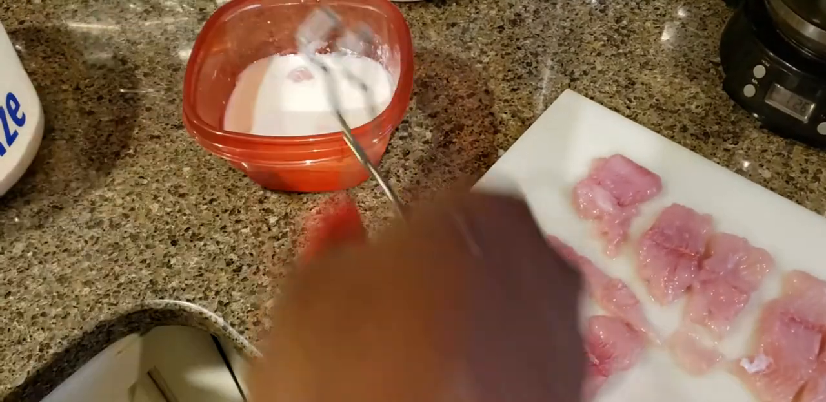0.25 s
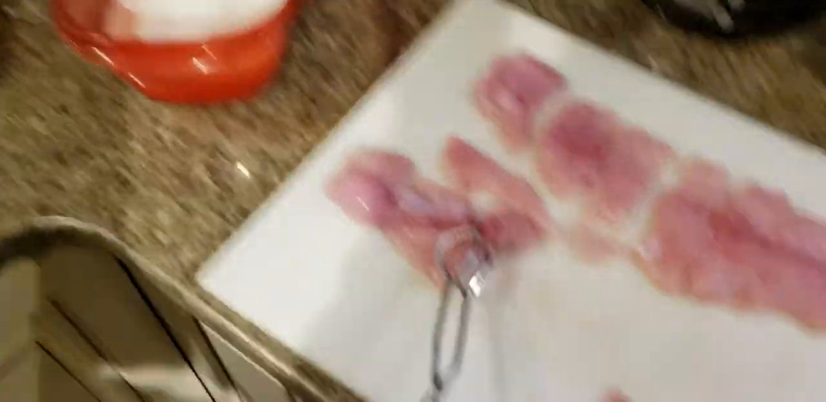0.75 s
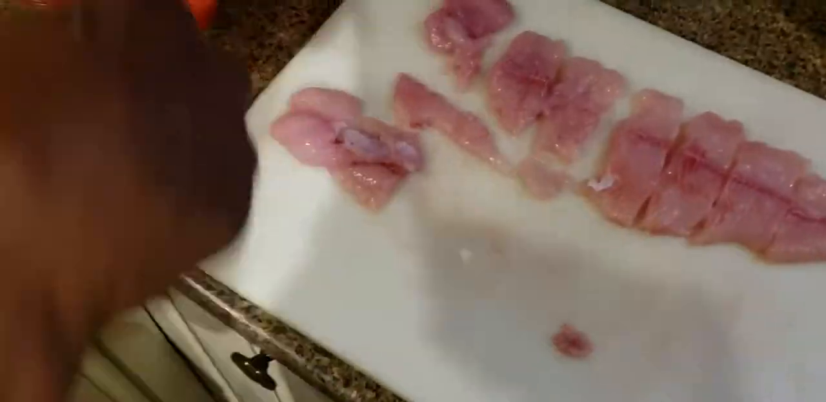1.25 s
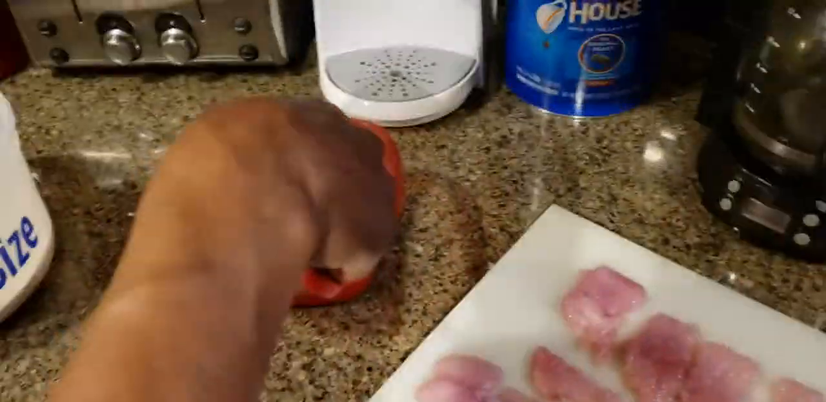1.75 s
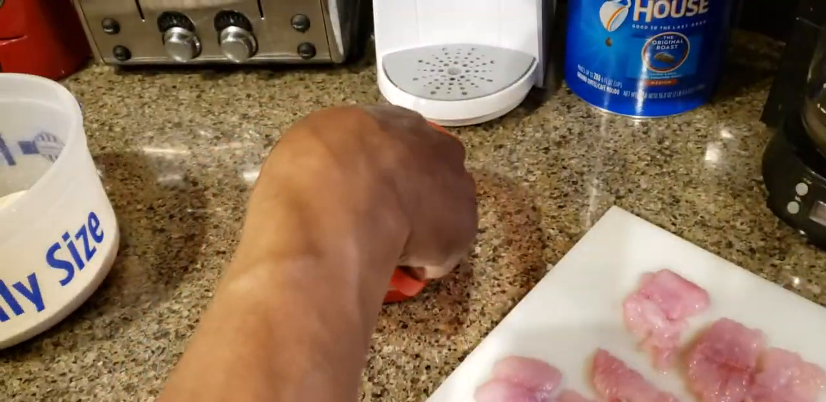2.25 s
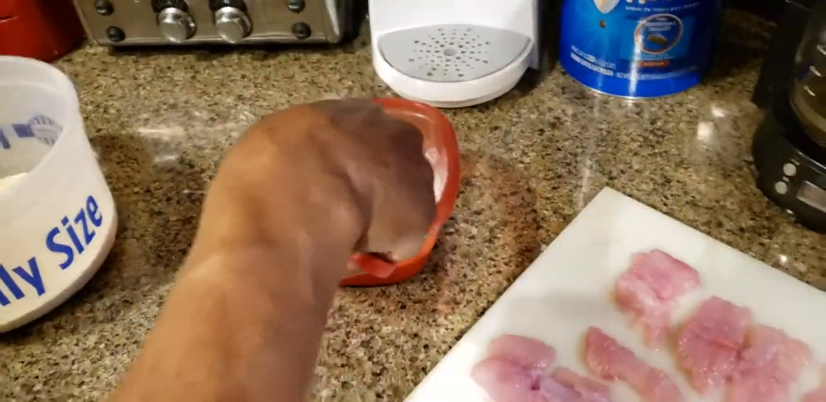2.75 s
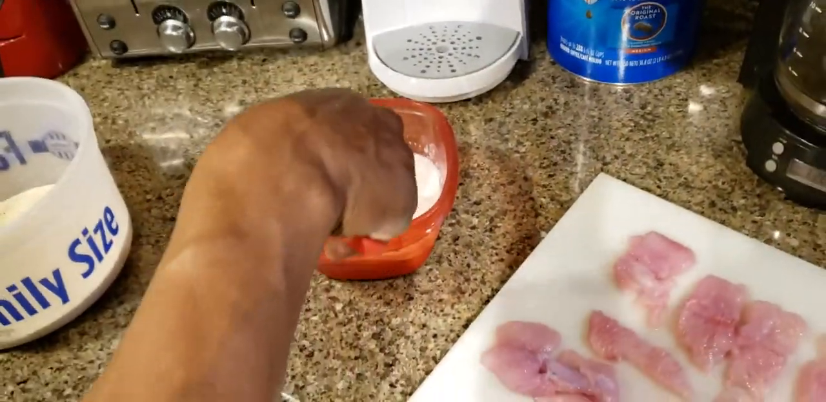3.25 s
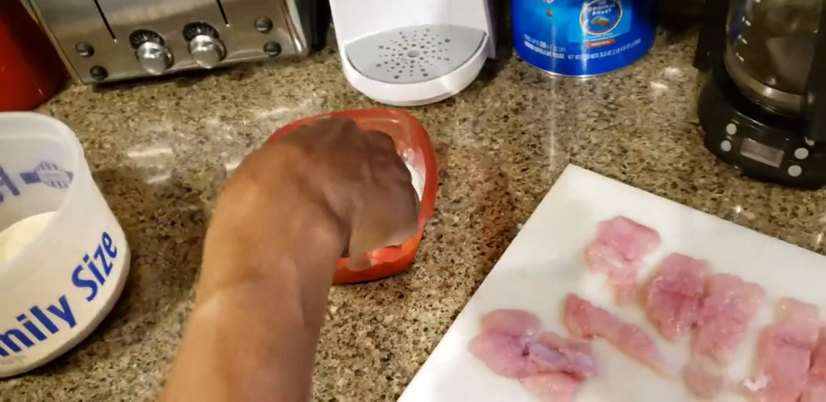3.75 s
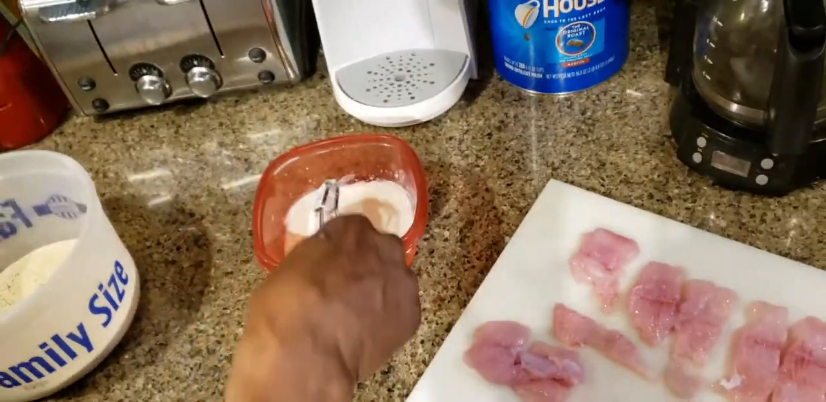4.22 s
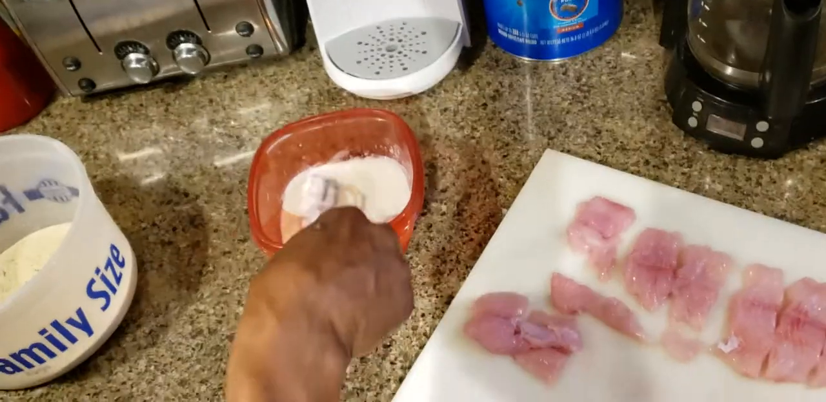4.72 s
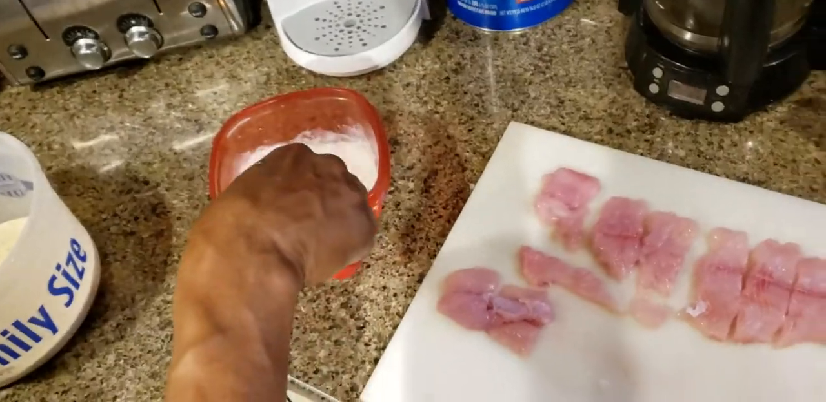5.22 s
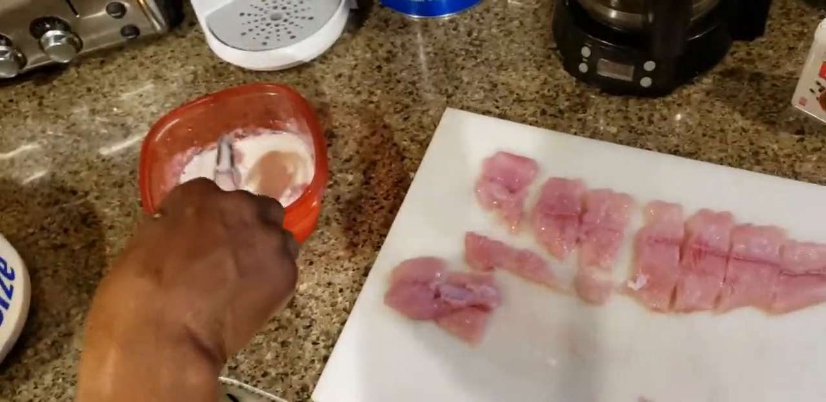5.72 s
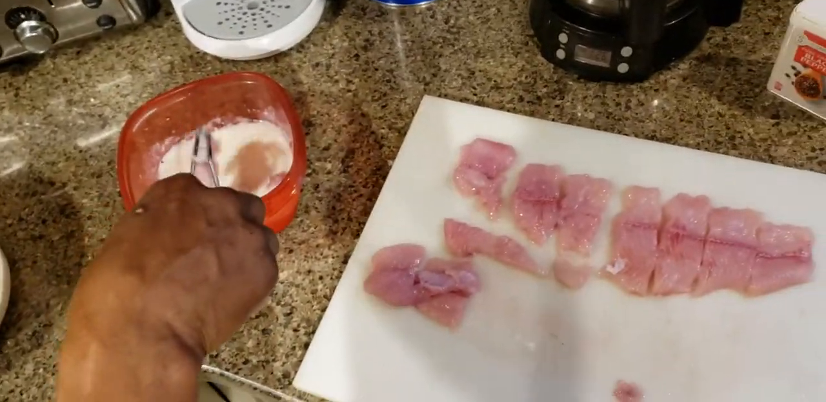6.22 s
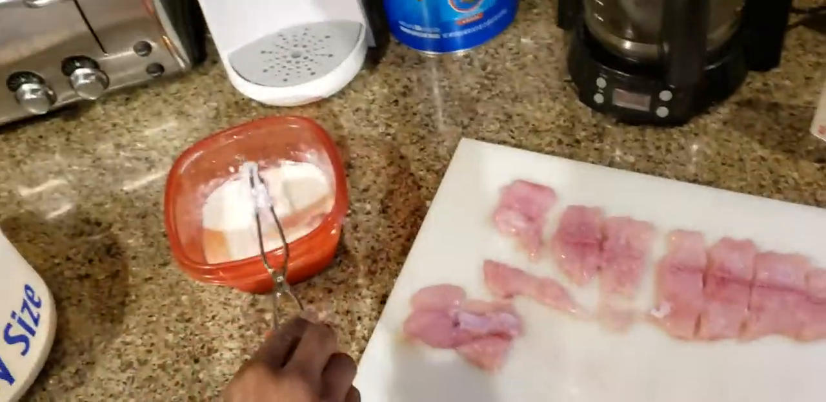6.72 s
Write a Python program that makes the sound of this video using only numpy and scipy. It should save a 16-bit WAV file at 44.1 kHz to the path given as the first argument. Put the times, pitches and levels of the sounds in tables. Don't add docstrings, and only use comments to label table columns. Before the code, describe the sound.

Metal tongs knock a cutting board, wet fish is dipped and squeezed in a plastic bowl, then the rim is rapped, over a steady fridge hum.

```python
import sys
import numpy as np
from scipy import signal
from scipy.fft import rfft, irfft
from scipy.io import wavfile
from scipy.ndimage import uniform_filter1d

SR = 44100
rng = np.random.default_rng(int(sys.argv[2]) if len(sys.argv) > 2 else 0)


def transcribe(u):
    v = np.clip(np.atleast_2d(u).T, -1, 1)
    q = np.round(v * 32767).astype(np.int16)
    wavfile.write(sys.argv[1], SR, q)


def magnitude_from_level(level_db):
    exponent = np.asarray(level_db, float) / 20
    return 10 ** exponent


N = 307377
T = np.arange(N) / SR

# (time [s], level [dB])
SHAFT_LEVEL = [(0.0, -39.5), (0.06, -40.5), (1.12, -38.5), (1.59, -40.5), (2.31, -38.5), (3.18, -41),
               (3.3, -35), (3.38, -39.5), (4.68, -39), (5.09, -38), (6.0, -40), (6.81, -37), (6.91, -41.5),
               (6.97, -35.5)]
SHAFT_HZ = 58.15
# (multiple of shaft rate [1], level over the buzz [dB])
BUZZ = [(2, -2.5), (8, -2), (15, -14), (17, -19.5), (18, -23.5)]
# (multiple of shaft rate [1], rms level [dB])
STEADY = [(3, -72.5), (9, -76.5), (10, -84), (11, -87), (16, -89.5), (107, -93), (117, -88)]
# (multiple of shaft rate [1], rms level [dB])
RISING = [(19, -86.5)]
BUZZ_DB, TURN_S, TURN_LENGTH_S, TURN_LOSS_DB = -63.5, 3.62, 0.35, -12.5
# (start [s], length [s], level [dB])
WHISTLES = [
    (0, 0.51, -83.5),
    (.75, 0.072, -87),
    (1.395, .3, -97),
    (2.195, .3, -94),
    (2.85, .7, -79),
    (3.8, 0.18, -88),
    (5.206, 1.4, -91),
]
WHISTLE_REST_DB, WHISTLE_EDGE_S = -91, .05
# (frequency [Hz], density [dB per Hz])
AIR = [(20, 0), (40, 2.5), (75, 8.5), (110, -8), (190, -6.5), (400, -17), (600, -24), (1240, -37.5),
       (3000, -36), (7500, -45.5), (8800, -46), (11500, -35.5), (15500, -36.5), (16300, -51.5)]
AIR_DB = -61
# (frequency [Hz], width [Hz], level [dB])
CABINET = [(322.6, 30, -74), (556.7, 19, -76.5), (930, 444, -86), (6300, 180, -85), (7000, 760, -81.5)]
# (frequency [Hz], t60 [s], level [dB])
ROOM = [(200, 0.61, -32), (680, 0.32, -15.5), (1566, 0.25, -12), (3000, 0.2, -10), (5727, 0.31, -11.5),
        (12000, 0.11, -7.5)]

# (frequency [Hz], width [Hz], level [dB])
BOARD = [(752.4, 380, -4.5), (1405, 570, 3), (2200, 487, 3), (3300, 640, 3), (4500, 720, 0),
         (5070, 1200, -7.5), (6300, 1230, -12.5)]
# (frequency [Hz], width [Hz], level [dB])
LOOSE = [(784, 192.6, -7), (1142, 173, -1.5), (1417, 80, 2), (1900, 200, -12), (3300, 1100, -18.5)]
# (frequency [Hz], width [Hz], level [dB])
BOWL_FULL = [(500, 500, -6), (900, 170, 7), (1400, 360, -3), (2180, 55, -17), (3300, 840, -42),
             (4400, 1870, -2), (6250, 3530, -2.5)]
# (frequency [Hz], width [Hz], level [dB])
BOWL_RIM = [(390, 80, -4), (567, 130, -1), (767, 35, 1), (1062, 80, 6), (1290, 110, 3), (1570, 380, -9.5),
            (3300, 340, -49), (4200, 6700, -44.5), (7260, 1250, -18)]
# (frequency [Hz], width [Hz], level [dB])
STREAKS = [(2070, 60, 2), (2600, 52, 2), (3500, 80, -7), (4270, 41, 5), (5010, 90, -4), (6450, 100, 2.5)]
TONG_HZ = 2050, 4200, 7100
TOP_HZ = 9000, 15800
MICROPHONE_LAG = 21

# (start [s], hold [s], hiss level [dB], release t60 [s], left minus right [dB])
SWELLS = [
    (3.70, 0.084, -79, 0.35, -11),
    (3.78, 0.076, -77, .25, -11),
    (3.87, .06, -73, 0.27, -9),
    (4.08, .005, -79, .05, -12),
    (.70, .1, -76, .25, 2),
]
SKIDS = [
    (6.905, 0.043, -53, .2, 4),
    (5.685, 0.027, -77, .15, 0),
    (5.632, .02, -75, .12, 0),
    (1.55, 0.043, -72, .15, 6),
]
DRAGS = [
    (1.416, .045, -45.5, .35, 5.5),
]
PEELS = [
    (1.256, 0.046, -61.5, 0.4, 8),
]
DIPS = [
    (2.77, 0.085, -63.5, 0.11, -13),
    (3.262, 0.099, -67.5, 0.3, -3.5),
    (3.438, 0.041, -55.5, 0.39, -5.5),
    (3.588, 0.04, -64.5, 0.14, -9),
]
SQUEEZE = [
    (3.465, .055, -50.5, 0.037, -10.5),
    (4.11, .01, -70, 0.061, -7),
    (3.385, .01, -62.5, .03, -7),
]
FILMS = [
    (4.2, 0.094, -88, .12, -17),
    (5.342, .01, -77, .4, -5),
    (3.43, 0.0044, -52.5, .12, -6.5),
]
RUBS = [
    (1.27, 0.1, -80, 0.11, 5.5),
    (1.782, 0.18, -88.5, .1, 7),
    (3.841, .01, -85.5, .06, -3),
    (4.166, 0.069, -87, .1, -2),
    (5.629, .06, -86.5, .1, 2),
    (2.771, 0.11, -82.5, .1, 0),
    (3.451, 0.14, -79.5, 0.11, 4),
]
# (time [s], peak level [dB], top level [dB], length [s], left minus right [dB])
SLIPS = [
    (2.77, -52.5, 6.5, 0.016, -9),
    (4.149, -55.5, 1.5, 0.011, -19),
    (4.177, -45.5, -0.5, 0.012, -17),
    (4.209, -47.5, 1, 0.013, -19),
    (4.243, -49, 1.5, 0.013, -17.5),
    (4.2906, -53, 2, 0.012, -18),
    (4.567, -53, -10, 0.014, 25),
]
# (time
# [s], peak level [dB], pitch [Hz], t60 [s], left minus right [dB])
DRIPS = [(1.86, -70.5, 2010, 0.34, 6), (1.93, -65, 2080, 0.18, 6), (1.96, -74, 1900, .06, 4.5),
         (2.255, -63.5, 4100, .03, 7), (2.35, -60, 900, 0.045, 11), (2.694, -57.5, 2000, 0.06, 5),
         (5.88, -68, 6800, .03, 16), (3.09, -63.5, 900, 0.045, 14), (4.57, -52, 7000, 0.073, 25),
         (5.10, -59, 2540, 0.11, 16), (5.345, -68.5, 4400, .04, -12), (5.345, -64, 12000, .06, -11.5),
         (6.147, -63, 2290, .05, 11.5), (2.779, -57.5, 3300, 0.11, -23), (3.437, -39, 5560, 0.054, -12),
         (3.437, -42.5, 13800, 0.051, -2), (4.179, -61, 149, .2, 3), (5.64, -61, 200, 0.18, 3),
         (6.16, -67, 2860, 0.17, 13)]
SPATTER = [(.657, -52, 14000, .02, 1), (.6602, -53, 6100, .015, 1), (0.63, -41, 6500, .015, 1.5),
           (.7176, -53, 9200, .015, 1.5), (.773, -54, 11500, .015, 0), (.7904, -43, 6800, .025, 3),
           (.806, -45, 7100, .02, 4), (.803, -47, 11500, .04, 3), (.8378, -40.5, 9300, .02, 1.5),
           (0.77, -50, 6300, .015, 1), (3.262, -61, 1330, .02, 12), (5.682, -64, 880, .03, 3),
           (1.418, -55, 3050, .04, 5), (3.348, -56, 5000, .015, -4), (3.6, -58, 7000, .015, -2),
           (3.8435, -51, 1950, .012, 1), (3.843, -59, 1100, .03, 0.5), (5.629, -53.5, 2070, 0.024, 0.5),
           (2.70, -59, 720, .05, 4), (2.76, -55, 610, .04, 4), (6.7195, -37, 3340, 0.011, 9),
           (6.904, -31, 3600, .012, 6), (6.904, -33, 6200, .03, 3.5), (6.72, -34, 6470, .04, 7),
           (6.721, -36, 780, 0.058, 11), (6.722, -43, 480, 0.074, 4.5), (6.735, -42, 600, .05, 5),
           (6.905, -36, 824, .074, 4), (6.91, -46, 700, .04, 4), (3.438, -36, 10500, .039, -14),
           (6.749, -46, 3300, .04, 5), (3.325, -54, 12000, .012, -4), (3.305, -58, 11500, .012, -4)]
THUDS = [(0.568, -45.5, 277, 1, 6), (2.773, -45.5, 105, 0.41, 5), (3.262, -31.5, 175, 0.42, 5),
         (3.264, -57, 417, 0.071, -2), (3.299, -36, 110, 0.14, 4), (3.59, -44.5, 149, 0.027, -18),
         (4.572, -48, 132, 0.11, 4.5), (4.752, -40.5, 129, 0.3, 2), (6.722, -37, 317, 0.2, 1.5),
         (6.739, -33, 111, 0.44, 3.5), (6.903, -36, 244, 0.34, 2)]
# (time [s], level [dB])
ROCKS = [(0.616, -40), (.632, -43), (.65, -44), (0.669, -37.5), (.685, -42.5), (.71, -48.5), (0.726, -48),
         (.74, -48), (.755, -44), (.79, -57.5), (.82, -62.5), (1.32, -66), (1.345, -66), (1.375, -68)]
ROCK_RISE_S, ROCK_T60_S = 0.043, 0.082
# (time [s], peak of middle mode [dB], high mode [dB], snap [dB], left minus right [dB])
CLICKS = [
    (1.5378, -50, 2, 7.5, 4.5),
    (2.756, -49.5, -3, -6, 4),
    (2.793, -53, -13, -20, -5),
    (2.924, -59.5, 4, 4, 4),
    (3.262, -57.5, 3, -15.5, 15),
    (3.3048, -50.5, -5, -13, -2),
    (3.3245, -49, -2, -7, -7),
    (3.4376, -48, 15, 20.5, -10.5),
    (3.5886, -56, 5, -2, -11),
]
OPEN_CLICKS = [
    (1.4174, -51, -7, -14, 1.5),
    (3.8434, -52, 6, -8, -12),
    (5.3132, -71, -3, -5.5, -11),
    (5.6284, -43, 9.5, 5, 2.5),
    (5.682, -45, 7, -5, -9),
]
# (time [s], peak level [dB], crack level [dB], rattle share [0-1], rattle t60 [s])
ON_BOARD = [
    (0.565, -20.5, -1.5, 0.23, 0.36),
]
ON_FULL = [
    (4.593, -31, -14, 0.16, 0.23),
    (4.745, -24, -11, 0.57, 0.21),
    (4.786, -29, -7.5, 0.27, 0.083),
    (4.829, -40, -21, 0.27, 0.085),
]
ON_RIM = [
    (6.718, -21.5, -10, 0.41, 0.125),
    (6.749, -35, -6, 0.67, 0.33),
    (6.903, -22, 3, 0.12, 0.037),
]


def band(x, lo_hz, hi_hz):
    return signal.sosfilt(signal.butter(3, [lo_hz, min(hi_hz, 20000)], "bandpass", fs=SR, output="sos"), x)


def ring(x, hz, width_hz):
    return signal.lfilter(*signal.iirpeak(hz, hz / width_hz, SR), x)


def body(x, peaks):
    return sum((-1) ** k * magnitude_from_level(db) * ring(x, hz, width) for k, (hz, width, db) in enumerate(peaks))


def unit(x):
    return x / np.sqrt(np.mean(x ** 2))


def fade(t, t60):
    return np.exp(-np.log(1000) * t / max(t60, .002))


def walk(rate, size=N):
    k = int(SR / rate)
    held = np.repeat(rng.standard_normal(size // k + 1), k)
    return uniform_filter1d(uniform_filter1d(held, k), k)[:size]


def add(out, s, sound, db, pan_db):
    sound = np.broadcast_to(sound, (2, sound.shape[-1])) / np.abs(sound).max()
    right_lag = int(np.clip(pan_db / 5, 0, 1) * MICROPHONE_LAG)
    for row, part, side, lag in zip(out, sound, (1, -1), (0, right_lag)):
        i = int(s * SR) + lag
        row[i:i + len(part)] += part[:N - i] * magnitude_from_level(db + side * pan_db / 2)


def air():
    hz = np.maximum(np.fft.rfftfreq(N, 1 / SR), 1)
    knot_hz, knot_db = np.transpose(AIR)
    shape = magnitude_from_level(np.interp(np.log(hz), np.log(knot_hz), knot_db))
    mid, side = rfft(rng.standard_normal((2, N)))
    side = side * np.clip(0.37 + hz / 3000, 0, 1)
    tone = irfft(shape * np.array([mid + side, mid - side]), N)
    level = np.sqrt(np.mean(band(tone, 60.8, 12300) ** 2))
    out = magnitude_from_level(AIR_DB + np.array([[1.5], [-1.5]])) * tone / level
    for f, width, db in CABINET:
        noise = ring(ring(rng.standard_normal((2, N)), f, width), f, width)
        out += magnitude_from_level(db + 0.57 * walk(8.0) + np.array([[2.5], [-2.5]])) * unit(noise)
    return out


def fridge():
    s, shaft_db = np.transpose(SHAFT_LEVEL)
    turn = 2 * np.pi * np.cumsum(SHAFT_HZ * (1 + 0.001 * walk(1.8))) / SR + 1.3
    out = magnitude_from_level(np.interp(T, s, shaft_db) + 0.23 * walk(8.9) + np.array([[1.9], [-2.1]])) * np.sin(turn)
    loss = TURN_LOSS_DB / (1 + np.exp((TURN_S - T) / TURN_LENGTH_S))
    fading = [(k, db + BUZZ_DB + loss) for k, db in BUZZ]
    rising = [(k, db + TURN_LOSS_DB - loss) for k, db in RISING]
    for k, db in fading + rising + STEADY:
        start = rng.uniform(0, 2 * np.pi) + min(k / 30, .6) * rng.standard_normal((2, 1))
        out = out + magnitude_from_level(db + 2.0 * walk(6) + np.array([[1.5], [-1.5]])) * np.sin(k * turn + start)
    return np.sqrt(2) * out


def valve():
    on = sum(magnitude_from_level(db) * (T >= s) * (T < s + length) for s, length, db in WHISTLES) + magnitude_from_level(WHISTLE_REST_DB)
    on = uniform_filter1d(on, int(WHISTLE_EDGE_S * SR) + 1)
    noise = unit(ring(ring(rng.standard_normal((2, N)), 3410, 120), 3446, 119.95))
    lines = np.sin(2 * np.pi * 59 * SHAFT_HZ * T) + .6 * np.sin(2 * np.pi * 60 * SHAFT_HZ * T)
    return on * magnitude_from_level(np.array([[3.5], [-.4]])) * (0.41 * noise + 0.67 * lines)


def kitchen(x):
    t = np.arange(int(.6 * SR)) / SR
    tail = 0
    for hz, t60, db in ROOM:
        noise = band(rng.standard_normal((2, len(t))), hz / 1.98, hz * 1.72)
        part = noise * fade(t, t60) * np.clip(t / 0.0031, 0, 1)
        tail = tail + magnitude_from_level(db) * part / np.sqrt(t60 * SR / 14)
    return signal.fftconvolve(x, tail, axes=1)[:, :N]


def drips(out, table, narrow, wide):
    t = np.arange(int(.15 * SR)) / SR
    for s, db, hz, t60, pan_db in table:
        pop = rng.standard_normal(len(t)) * (fade(t, 0.01) + 0.38 * fade(t, t60))
        add(out, s, ring(ring(pop, hz, narrow * hz), hz, wide * hz), db, pan_db)


def slides(out, table, attack_s, edge_hz, peak_hz, top_db, body_db, low_db, top_share, top_hz):
    t = np.arange(int(.5 * SR)) / SR
    for s, hold, db, t60, pan_db in table:
        a = int(max(s, 0) * SR)
        grains = rng.standard_normal((2, len(t)))
        grains = grains * magnitude_from_level(2.4 * np.minimum(rng.exponential(size=(2, len(t))), 5))
        grains = (grains + 0.047 * grains[::-1]) * magnitude_from_level(1.6 * walk(44.7, size=len(t)))
        hiss = band(grains + 0.22 * ring(grains, peak_hz, 990), edge_hz, 7500)
        layers = hiss, band(grains, top_hz, TOP_HZ[1]), band(grains, 970, 3210), band(grains, 63, 690)
        rise = np.clip(t / attack_s, 0, 1) ** 2
        after = np.maximum(t - attack_s - hold, 0)
        side = np.array([[pan_db], [-pan_db]]) / 2
        for layer, over_db, share in zip(layers, (0, top_db, body_db, low_db), (1, top_share, 1, 1)):
            sound = unit(layer) * magnitude_from_level(side + db + over_db) * rise * fade(after, share * t60)
            out[:, a:a + len(t)] += sound[:, :N - a]


def slips(out):
    t = np.arange(int(.06 * SR)) / SR
    for s, db, top_db, length, pan_db in SLIPS:
        puff = rng.standard_normal(len(t)) * np.clip(t / 0.0016, 0, 1) / (1 + (t / length) ** 8)
        add(out, s, band(puff, 3701 + 2200 * (pan_db > 0), 10300), db, pan_db)
        add(out, s, band(puff, *TOP_HZ) + band(puff, 11000, 14000), db + top_db, pan_db)


def streaks(out):
    t = np.arange(int(.3 * SR)) / SR
    scrape = rng.standard_normal((2, len(t))) * fade(t, 0.32)
    start, pan_db = DRAGS[0][0], DRAGS[0][4]
    add(out, start, body(scrape, STREAKS), -37, pan_db)


def clicks(out, table, low_db):
    t = np.arange(int(.05 * SR)) / SR
    for s, db, high_db, snap_db, pan_db in table:
        snap = (t == 0) + 0.16 * rng.standard_normal(len(t)) * fade(t, 0.006)
        for hz, width, over_db in zip(TONG_HZ, (350, 800, 1100), (low_db, 0, high_db)):
            add(out, s, ring(ring(snap, hz, width), hz, 2 * width), db + over_db, pan_db)
        add(out, s, band(snap, *TOP_HZ), db + snap_db, pan_db)


def thuds(out):
    t = np.arange(int(.35 * SR)) / SR
    for s, db, hz, t60, pan_db in THUDS:
        push = rng.standard_normal(len(t)) * (fade(t, t60) + 2.2 * fade(t, 0.014)) * np.clip(t / 0.0015, 0, 1)
        low = ring(ring(push, hz, 0.69 * hz), hz, 2.0 * hz)
        add(out, s, low + 0.0085 * band(push, 310, 640), db, pan_db)


def shudder():
    swell = 0
    for s, db in ROCKS:
        swell = swell + magnitude_from_level(db) * np.where(T < s, fade(s - T, ROCK_RISE_S), fade(abs(T - s), ROCK_T60_S))
    drive = rng.standard_normal((2, N)) * magnitude_from_level(3.2 * walk(140))
    return unit(band(body(drive, LOOSE), 647.5, 5000)) * swell * magnitude_from_level(np.array([[2], [-2]]))


def knocks(out, table, peaks, blow_t60, bright_share, top_db, spread, pan_db):
    t = np.arange(int(.4 * SR)) / SR
    for s, db, crack_db, share, t60 in table:
        noise = rng.standard_normal((3, len(t))) * magnitude_from_level(2 * walk(300, size=len(t)))
        noise = noise[0] + spread * noise[1:]
        low = (noise + 0.5 * noise[::-1]) * (fade(t, blow_t60) + share * fade(t, t60))
        high = noise * (fade(t, .5 * blow_t60) + share * fade(t, bright_share * t60))
        add(out, s, band(body(low, peaks), 300, 2500), db, pan_db)
        add(out, s, band(body(high, peaks), 3100, 6680), db + crack_db, pan_db)
        add(out, s, band(high * fade(t, 0.32), *TOP_HZ), db + crack_db + top_db, pan_db)


def scene():
    hits, small, close = np.zeros((3, 2, N))
    knocks(hits, ON_BOARD, BOARD, blow_t60=0.049, bright_share=0.79, top_db=-30.5, spread=1.3, pan_db=5.5)
    knocks(hits, ON_FULL, BOWL_FULL, blow_t60=0.026, bright_share=0.93, top_db=-12.5, spread=0.78, pan_db=8.0)
    knocks(hits, ON_RIM, BOWL_RIM, blow_t60=0.029, bright_share=0.57, top_db=-12, spread=0.67, pan_db=6)
    thuds(small)
    drips(small, DRIPS, narrow=.11, wide=.31)
    drips(small, SPATTER, narrow=0.19, wide=0.42)
    slides(small, SWELLS, top_hz=10500, attack_s=0.069, edge_hz=6000, peak_hz=6800,
           top_db=5, body_db=-14, low_db=-25, top_share=.8)
    slides(small, SKIDS, top_hz=8500, attack_s=0.0037, edge_hz=2750, peak_hz=6400,
           top_db=-12, body_db=-2.5, low_db=-18, top_share=.7)
    streaks(small)
    slides(small, DRAGS, top_hz=8300, attack_s=0.0024, edge_hz=3000, peak_hz=4100,
           top_db=-4, body_db=-1.0, low_db=-15, top_share=0.8)
    slides(small, PEELS, top_hz=10500, attack_s=0.0063, edge_hz=5130, peak_hz=6400,
           top_db=-4.5, body_db=-12.0, low_db=-11, top_share=0.61)
    slides(small, DIPS, top_hz=9400, attack_s=0.003, edge_hz=3140, peak_hz=4360,
           top_db=-2.5, body_db=-15.0, low_db=-5.0, top_share=1.4)
    slides(small, SQUEEZE, top_hz=10200, attack_s=0.046, edge_hz=2850, peak_hz=5400,
           top_db=-11, body_db=-11.0, low_db=-17.0, top_share=0.9)
    slides(small, FILMS, top_hz=10800, attack_s=0.0088, edge_hz=6000, peak_hz=7500,
           top_db=3.5, body_db=-13.5, low_db=-14, top_share=0.86)
    slides(small, RUBS, top_hz=9000, attack_s=0.011, edge_hz=2600, peak_hz=4040,
           top_db=-3, body_db=8, low_db=11, top_share=.9)
    small += shudder()
    clicks(close, CLICKS, low_db=-28)
    clicks(close, OPEN_CLICKS, low_db=-5.0)
    slips(close)
    echo = magnitude_from_level(5.5) * kitchen(hits + 0.61 * small + 0.22 * close)
    return hits + small + close + echo + fridge() + valve() + air()


def top_cut(x):
    return signal.sosfilt(signal.butter(12, 16460, fs=SR, output="sos"), x)


def record(dry):
    cut = signal.sosfilt(signal.ellip(10, .3, 40, 15950, fs=SR, output="sos"), dry)
    return top_cut(cut - 0.22 * ring(cut, 8870, 1200))


dry = scene()
out = record(dry)
transcribe(out)
```